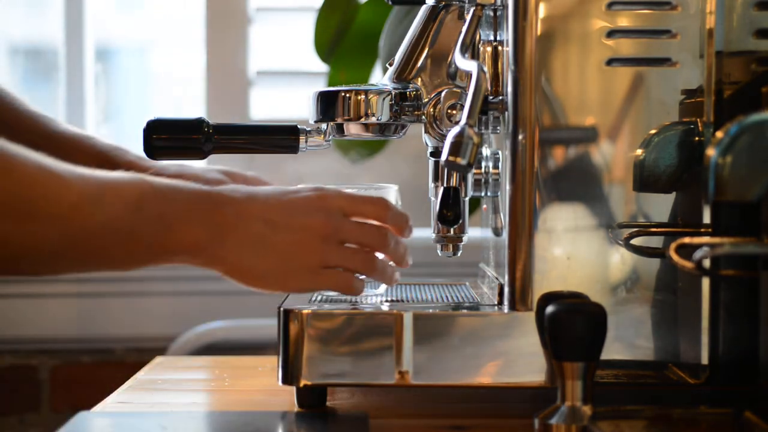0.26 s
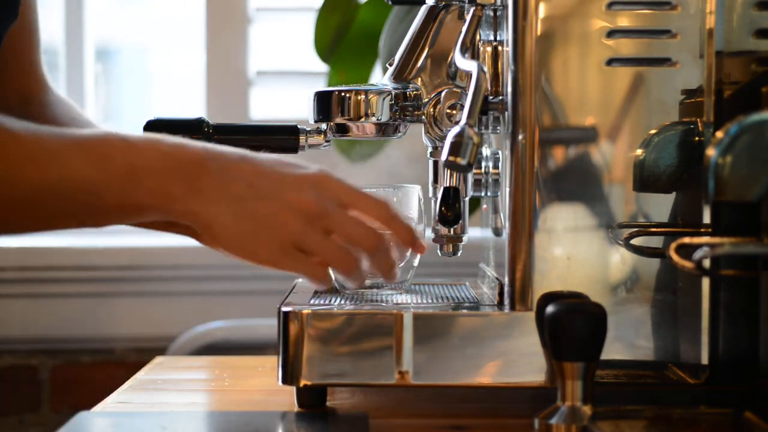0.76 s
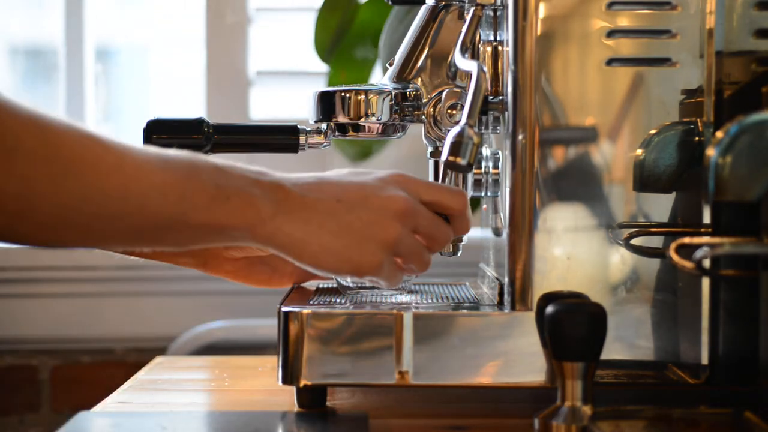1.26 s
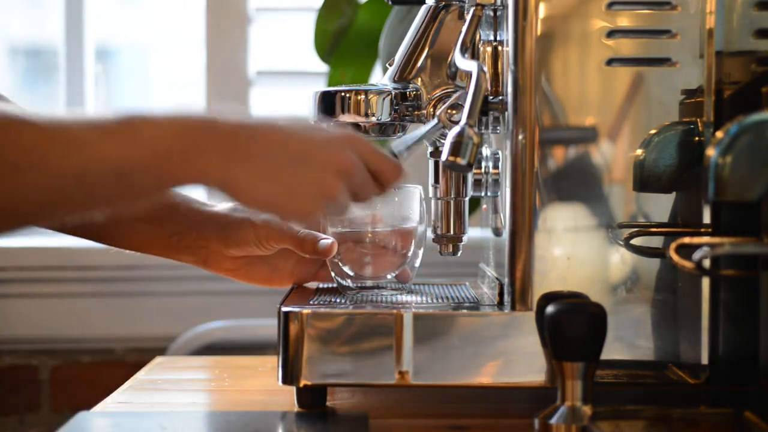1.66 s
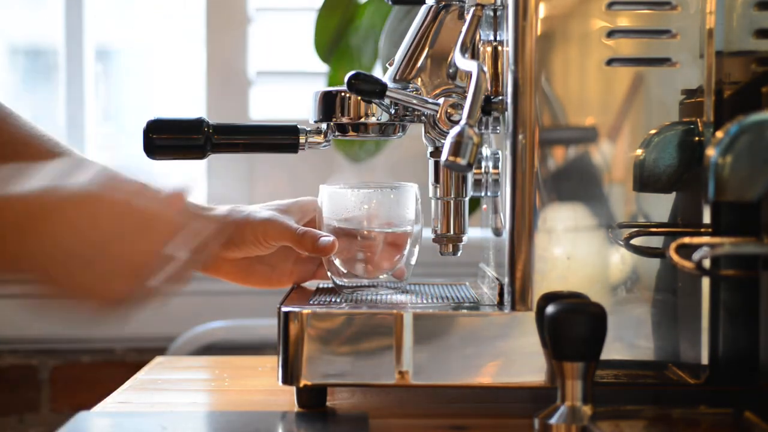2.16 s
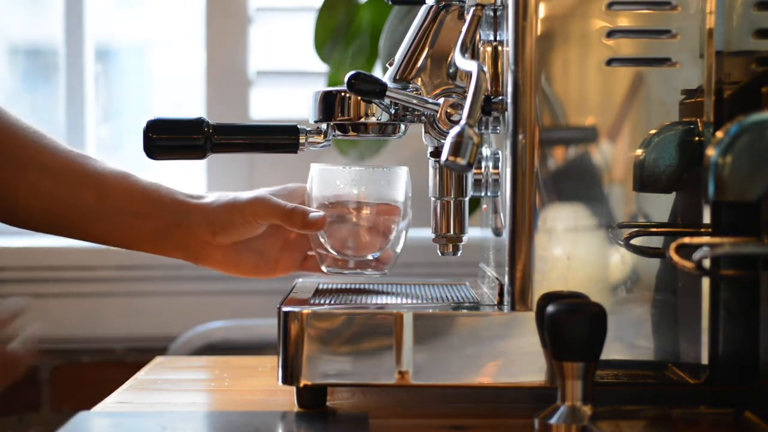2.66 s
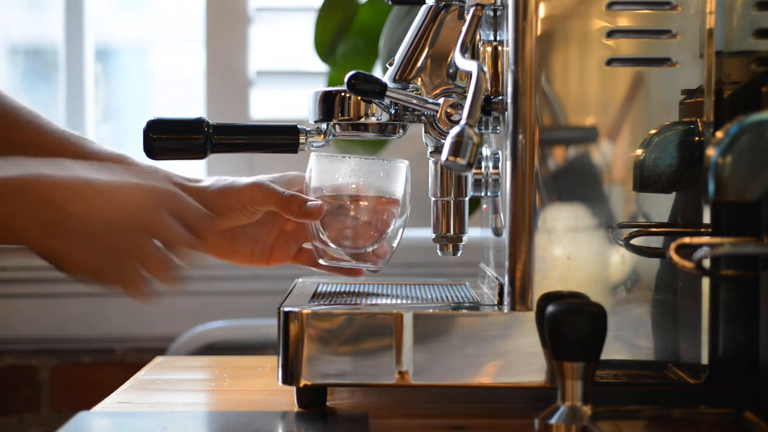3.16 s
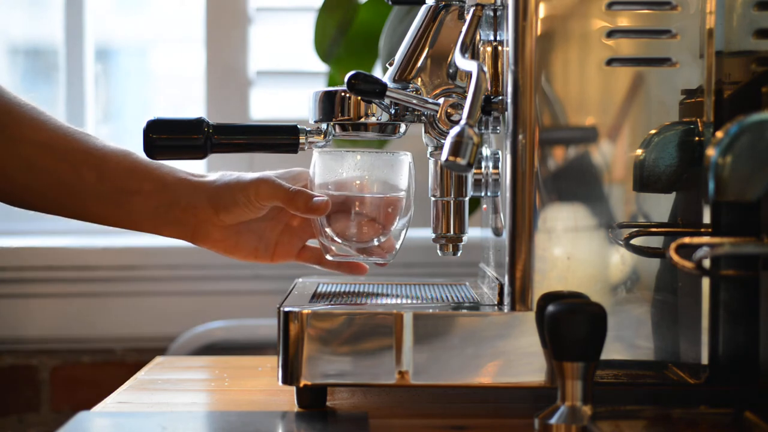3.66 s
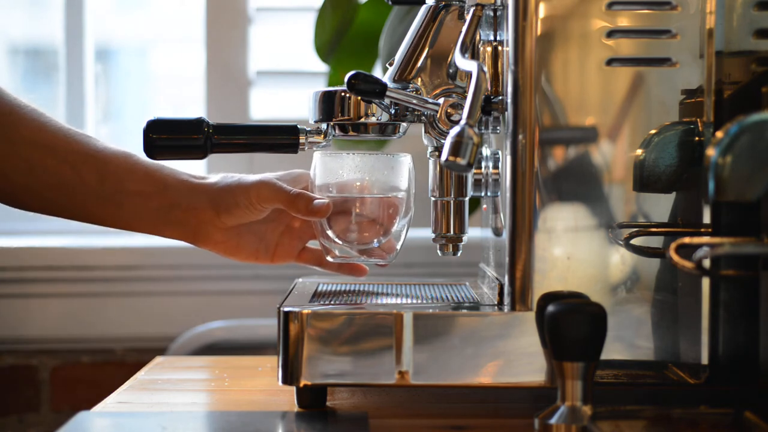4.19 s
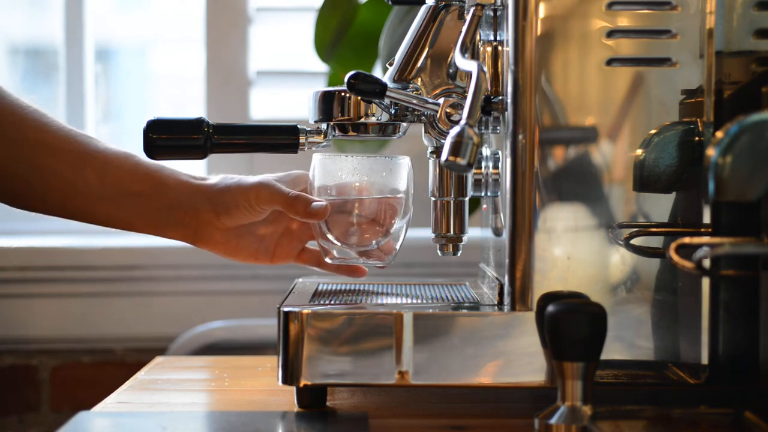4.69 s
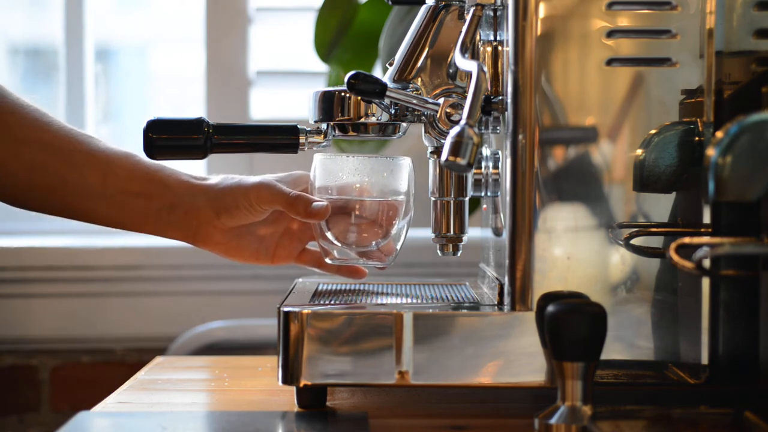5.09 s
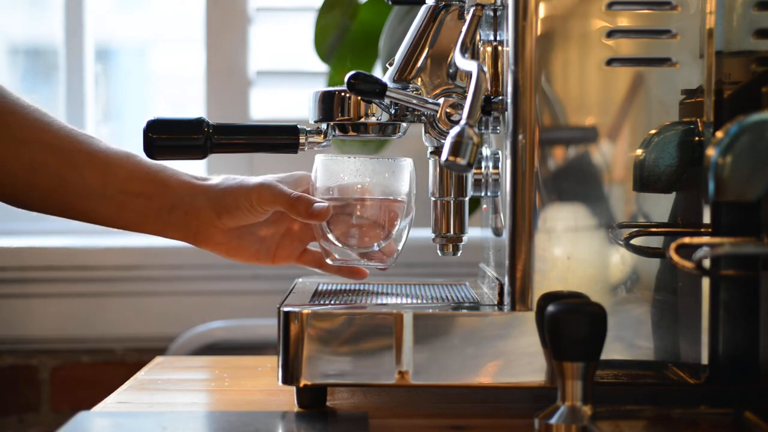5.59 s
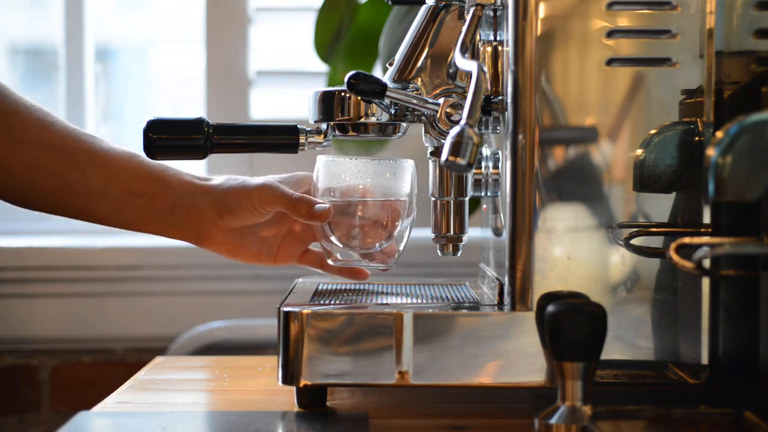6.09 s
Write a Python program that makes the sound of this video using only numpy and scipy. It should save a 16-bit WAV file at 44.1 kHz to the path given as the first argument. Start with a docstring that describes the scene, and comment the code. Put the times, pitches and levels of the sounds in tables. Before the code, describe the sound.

A glass clatters onto a metal drip tray and scrapes into place, a lever clacks hard, and an espresso machine pump buzzes steadily until the end.

```python
"""A small kitchen with hard walls and a quiet room tone, espresso machine in front; the pump is heard dry, as if close.
A glass lands on the steel drip tray, rocks and is slid into place: struck modes, coloured hiss and squeaks.
The brew lever clacks up, switches snap and the vibration pump starts, one piston stroke per mains cycle:
harmonics hum in the casing and buzz in its panels, taps rattle the fittings and water churns as coloured noise.
The lifted glass clinks against the filter holder."""
import sys
import numpy as np
from scipy import signal
from scipy.fft import rfft, irfft
from scipy.io import wavfile
from scipy.ndimage import uniform_filter1d

SR = 44100
rng = np.random.default_rng(int(sys.argv[2]) if len(sys.argv) > 2 else 0)


def waveform_to_disk(signal):
    """Save audio, clipped to [-1, 1], as 16-bit WAV at the path in sys.argv[1]."""
    frames = np.transpose(np.atleast_2d(signal))
    scaled = np.clip(frames, -1, 1) * 32767
    samples = np.round(scaled).astype(np.int16)
    wavfile.write(sys.argv[1], SR, samples)


N = 279594
TIME = np.arange(N) / SR
TAIL = TIME[:SR * 3 // 4]   # time axis of every ring: 0.75 s


def from_db(db):
    """Decibels to amplitude."""
    return 10 ** (np.asarray(db) / 20)


def rms_one(x):
    """Scaled to rms 1 over its whole length."""
    return x / np.sqrt(np.mean(x ** 2) + 1e-20)


def steady(x):
    """Scaled to a running rms of 1 over half a second."""
    return x / np.sqrt(uniform_filter1d(x ** 2, size=SR // 2))


def ramp(start_s, length_s):
    """Rises evenly from 0 to 1, starting at start_s."""
    return np.clip((TIME - start_s) / length_s, 0, 1)


def dying(t60_s):
    """Falls 60 dB in t60_s."""
    return from_db(-60 * TAIL / t60_s)


def swelling(swell_s):
    """Smooth rise from 0 to 1 of a body that takes up a blow slowly."""
    return 1 - np.exp(-(TAIL / swell_s) ** 2)


def drift(rate_hz):
    """Smooth chance with spread near 1, renewed rate_hz times a second."""
    steps = rng.standard_normal(2048)
    return np.interp(TIME * rate_hz, np.arange(len(steps)), steps)


def noise(spectrum, size):
    """Noise of rms 1 with the given colour, cut away below the first row."""
    hz, db = np.transpose(spectrum)
    bins_hz = np.fft.rfftfreq(size, 1 / SR) + 1   # 1 Hz up, to avoid log of zero
    colour = from_db(np.interp(np.log(bins_hz), np.log(hz), db))
    low_cut = 1 / np.sqrt(1 + (hz[0] / 2 / bins_hz) ** 6)
    return rms_one(irfft(rfft(rng.standard_normal(size)) * colour * low_cut, size))


def resonate(x, hz, width_hz):
    """One resonance driven by x, scaled to rms 1."""
    radius = np.exp(-np.pi * width_hz / SR)
    poles = [1, -2 * radius * np.cos(2 * np.pi * hz / SR), radius * radius]
    return rms_one(signal.lfilter([1, 0, -1], poles, x))


def dense_ring(spectrum, t60_s, damping):
    """Crowded modes as noise dying octave by octave, the high ones sooner; t60_s holds at 1 kHz."""
    size = len(TAIL)
    whole = rfft(noise(spectrum, size))
    octave = np.log2(np.clip(np.fft.rfftfreq(size, 1 / SR), 125, 16000) / 1000)
    out = np.zeros(size)
    for k in range(-3, 5):
        weight = np.maximum(1 - np.abs(octave - k), 0)   # overlapping triangles, one octave apart
        out += irfft(whole * weight, size) * dying(t60_s * 2 ** (-damping * k))
    return out


def clear_ring(modes, longest_t60_s, uneven_db):
    """Single modes as dying sines, each struck with a strength and sign of its own."""
    hz, db, t60_s = np.transpose(modes)
    total = np.sqrt(np.sum(from_db(db) ** 2) / 2)
    gains = from_db(db + uneven_db * rng.standard_normal(len(hz))) / total
    gains = gains * rng.choice([-1, 1], len(hz))
    out = np.zeros(len(TAIL))
    for gain, f, t60 in zip(gains, hz, t60_s):
        out += gain * np.sin(2 * np.pi * f * TAIL) * dying(min(t60, longest_t60_s))
    return out


def tilted(table, bright_db):
    """Levels tilted by bright_db an octave about 3 kHz."""
    rows = np.array(table, float)
    rows[:, 1] += bright_db * np.log2(np.clip(rows[:, 0], 200, 12000) / 3000)
    return rows


def add(track, start_s, sound):
    """Lay a sound into the track at start_s."""
    start = round(start_s * SR)
    track[start:start + len(sound)] += sound[:N - start]


def blows(hits, spectrum, modes, t60_s, damping, modes_db, longest_t60_s):
    """Each contact rings crowded and clear modes of the body, with a brightness of its own."""
    out = np.zeros(N)
    for start_s, level_db, bright_db in hits:
        crowd = dense_ring(tilted(spectrum, bright_db), t60_s, damping)
        notes = clear_ring(tilted(modes, bright_db), longest_t60_s, uneven_db=2.5)
        add(out, start_s, from_db(level_db) * (crowd + from_db(modes_db) * notes))
    return out


def kitchen(x, wet_db, first_echo_s=0.0034):
    """The place: a short diffuse tail off hard walls, added to the direct sound."""
    tail = dense_ring([(100, -3), (300, 0), (6000, -1), (15000, -10)], t60_s=0.52, damping=0.1)
    tail = tail * (TAIL > first_echo_s)
    return x + from_db(wet_db) * signal.fftconvolve(x, tail / np.linalg.norm(tail))[:N]


# colour of the quiet kitchen: pitch_hz, level_db (per Hz)
ROOM_COLOUR = [(15, -42), (25, -6.5), (122, 5), (340, 0.5), (433, -0.5), (509, -5), (895, -6.5), (997, -9),
               (1270, -9), (1410, -8.5), (2700, -15), (8580, -24.5), (15500, -29.5)]


def room_tone(level_db=-47.5):
    """Steady coloured noise behind everything."""
    return from_db(level_db) * noise(ROOM_COLOUR, size=N)


# the glass rocks on its base, weaker each time, and its rim touches twice in every rock
ROCK_START_S, ROCK_PERIOD_S, ROCK_DB, ROCK_LOSS_DB, ROCK_BRIGHT_DB = 0.293, 0.096, -33, 4, -0.5
RETOUCH_S, RETOUCH_LOSS_DB = 0.015, 0


def rocking(count=3):
    """Contacts of the rocking glass: evenly spaced pairs that die away."""
    contacts = []
    for k in range(count):
        for again in (0, 1):
            start_s = ROCK_START_S + k * ROCK_PERIOD_S + again * RETOUCH_S
            level_db = ROCK_DB - k * ROCK_LOSS_DB - again * RETOUCH_LOSS_DB
            contacts.append((start_s, level_db, ROCK_BRIGHT_DB))
    return contacts


# fingers nudge the glass into place with faint ticks at uneven moments
NUDGE_FROM_S, NUDGE_TO_S, NUDGE_DB, NUDGE_BRIGHT_DB = 0.95, 1.12, -52.5, -1.5


def nudges(count=8, uneven_db=3.0):
    """Faint contacts, one at a chance moment in each equal share of the nudging time."""
    step_s = (NUDGE_TO_S - NUDGE_FROM_S) / count
    contacts = []
    for k, (late, strength) in enumerate(rng.random((count, 2))):
        level_db = NUDGE_DB + uneven_db * (2 * strength - 1)
        contacts.append((NUDGE_FROM_S + step_s * (k + late), level_db, NUDGE_BRIGHT_DB))
    return contacts


# glass landing on the tray: start_s, level_db, brightness_db_per_octave
LANDING_HITS = [(0.169, -16, 2), (0.1746, -17, 2.5), (0.185, -27.5, -7), (0.196, -31, 5),
                (0.215, -22, -2.5), (0.227, -25.5, 2.5)]
# clear notes of the steel grid: pitch_hz, level_db, t60_s (before the cap)
GRID_MODES = [(1423, 3, 0.42), (1880, -5, 0.63), (2270, 5, 0.12), (3200, -18, 0.34), (3640, -13, 0.27),
              (3970, -3, 0.19), (4300, -12, 0.32), (5030, 3, 0.47), (6100, -1, 0.26), (8260, -14, 0.28)]
# crowded modes of the grid: pitch_hz, level_db (per Hz)
GRID_CLATTER = [(50, -40), (240, -5.5), (380, -7), (500, -9), (1000, -8.5), (1400, -10), (1600, -10.5),
                (2200, -12), (2800, -16), (4000, -11.5), (5100, -11), (7000, -19.5), (10000, -29.5),
                (15500, -43)]


def tray_clatter():
    """Landing, rocking and nudging contacts all ring the steel grid."""
    hits = LANDING_HITS + rocking() + nudges()
    return blows(hits, GRID_CLATTER, GRID_MODES, t60_s=0.22, damping=0.12,
                 modes_db=-17.5, longest_t60_s=0.43)


# low notes of the hollow pan under the grid: pitch_hz, level_db, t60_s, swell_s
PAN_NOTES = [(256, -14.5, 0.19, 0.016), (686, -1.5, 0.15, 0.035)]


def pan_boom():
    """The steel pan takes up the blow slowly and rings with a few low notes."""
    out = np.zeros(N)
    start_s = LANDING_HITS[1][0]
    for hz, db, t60_s, swell_s in PAN_NOTES:
        note = np.sin(2 * np.pi * hz * TAIL) * dying(t60_s) * swelling(swell_s)
        add(out, start_s, from_db(db) * note)
    return out


# squeaks as the glass slips: start_s (the middle), pitch_hz, level_db (at the peak), length_s
GLASS_SQUEAKS = [(1.026, 3650, -50, 0.015), (1.068, 3400, -58, .008), (1.53, 4830, -53.5, .06)]


def glass_squeaks(width_hz=220):
    """Each slip is a narrow band of noise that swells and fades."""
    out = np.zeros(N)
    for middle_s, hz, db, length_s in GLASS_SQUEAKS:
        envelope = np.exp(-((TIME - middle_s) / length_s) ** 2)
        out += from_db(db) * envelope * resonate(rng.standard_normal(N), hz, width_hz)
    return out


# pushes that slide the glass over the grid: start_s, length_s, level_db (before slide_db and grip)
GLASS_PUSHES = [(0.622, 0.098, -52), (0.872, 0.37, -52.5), (1.225, 0.13, -50), (1.36, 0.29, -53)]
# colour of glass sliding on steel: pitch_hz, level_db (per Hz)
SLIDE_HISS = [(500, -11), (1200, -6), (2700, -8.5), (3700, -5), (4400, -2), (4950, 0.5), (5400, -3.5),
              (6600, -6), (8000, -17), (12000, -35)]


def glass_slide(slide_db=-1.5, grip_db=1.5, ease_s=0.02):
    """Friction hiss during each push, flickering as the grip varies."""
    sliding = np.zeros(N)
    for start_s, length_s, db in GLASS_PUSHES:
        sliding += from_db(db) * (ramp(start_s, ease_s) - ramp(start_s + length_s, ease_s))
    grip = from_db(slide_db + grip_db * drift(71.1))
    return sliding * grip * noise(SLIDE_HISS, size=N)


# lever striking its stop and rebounding: start_s, level_db, brightness_db_per_octave
LEVER_STRIKES = [(1.5955, -14.5, 3.5), (1.598, -10, 2.5), (1.602, -14.5, -1.5), (1.607, -21.5, -3.5),
                 (1.618, -33, -10)]
# clear notes of the lever: pitch_hz, level_db, t60_s (before the cap)
LEVER_NOTES = [(286, -0.5, 0.19), (615, 0, 0.39), (1386, 6.5, 0.16), (1879, -2.5, 0.27), (2500, -18, 0.091),
               (2940, -15, 0.19), (3666, -33, 1.0), (4760, -20, 5.0), (5140, -26, 0.86), (6190, -12, 0.031),
               (6300, -22, 0.28), (7250, -8, 0.43)]
# crowded modes of the clack: pitch_hz, level_db (per Hz)
LEVER_CROWD = [(59, -54), (100, -32), (275, 0), (429, -24), (614, -2.5), (998, -24), (1210, -5), (1430, 2),
               (2130, -15), (2630, 4), (3180, -15), (6000, -12), (6530, -20.5), (9950, -22), (15500, -41)]


def brew_lever():
    """The lever clacks against its stop, each rebound ringing it again."""
    return blows(LEVER_STRIKES, LEVER_CROWD, LEVER_NOTES, t60_s=0.11, damping=0.12,
                 modes_db=-13, longest_t60_s=0.16)


# valve and pump switch snapping: start_s, level_db, brightness_db_per_octave
SNAPS = [(1.644, -25, -8), (1.6485, -24, -5.5), (1.7175, -35, 8), (1.721, -25, -7.5), (1.738, -26.5, -8),
         (1.794, -31, -10)]
# clear notes of the snap: pitch_hz, level_db, t60_s (before the cap)
SNAP_NOTES = [(5330, -6, 0.074), (6000, 0, 0.077), (6100, 1, 0.079), (6950, 1, 0.097), (7600, -9, 0.098),
              (8700, -12, .12)]
# crowded modes of the snap: pitch_hz, level_db (per Hz)
SNAP_CROWD = [(100, -40), (1000, -21.5), (3500, -10), (6000, 2.5), (7500, -1), (10000, -11), (15500, -27)]


def switches():
    """Valve and pump switch snap, with high, very short notes."""
    return blows(SNAPS, SNAP_CROWD, SNAP_NOTES, t60_s=0.18, damping=0.18,
                 modes_db=-3.5, longest_t60_s=0.039)


# glass against the filter holder: start_s, level_db, brightness_db_per_octave
CLINK_CONTACTS = [(2.8555, -21.5, -1.5), (2.859, -23.5, 1), (2.881, -24.5, -4)]
# clear notes of the glass: pitch_hz, level_db, t60_s (before the cap)
GLASS_NOTES = [(1824, 3, 0.11), (3720, -8, 0.15), (5350, -2, 0.1), (6180, -7, 0.071), (7240, -17, .06),
               (7900, -16, 0.11)]
# crowded modes of the tick: pitch_hz, level_db (per Hz)
TICK_CROWD = [(100, -38), (500, 5), (1000, 9), (2500, -3), (4000, 11), (7000, -26), (10000, -17),
              (15500, -29)]


def glass_clink():
    """The lifted glass touches the filter holder: ticks with short glassy notes."""
    return blows(CLINK_CONTACTS, TICK_CROWD, GLASS_NOTES, t60_s=0.056, damping=0.12,
                 modes_db=1.5, longest_t60_s=0.13)


PUMP_START_S, MAINS_HZ = 1.745, 60   # one piston stroke per mains cycle
# when each part answers within a stroke: piston knocks, panels start to ring, casing swings back
KNOCK_MS, PANEL_MS, CASING_MS = 5.35, 0.32, 11.88
FIRST_KNOCK_ORDER, FIRST_PANEL_ORDER = 8, 13
SMEAR_MS_PER_ORDER = 3.8   # sheet metal carries each pitch at its own speed
# around this harmonic the casing lets its lower notes come later
CASING_ORDER, CASING_SMEAR_MS_PER_ORDER = 5, 2.6
SCATTER_TURNS = 0.076   # unevenness of the delay at the lowest panel harmonic; it grows with pitch


def stroke_delay(order):
    """Delay of one harmonic after the start of the stroke, in turns of that harmonic."""
    if order < FIRST_KNOCK_ORDER:
        ms = CASING_MS - CASING_SMEAR_MS_PER_ORDER * (order - CASING_ORDER) ** 2 / (2 * order)
    elif order < FIRST_PANEL_ORDER:
        ms = KNOCK_MS
    else:
        ms = PANEL_MS + SMEAR_MS_PER_ORDER * (order - FIRST_PANEL_ORDER) ** 2 / (2 * order)
    turns = order * MAINS_HZ * ms / 1000
    return turns + SCATTER_TURNS * (order / FIRST_PANEL_ORDER) ** 2 * rng.standard_normal()


# the casing hums hard while the pump runs free, settles, then grows slowly with the pressure
HUM_DB, FREE_RUN_DB, SETTLE_S, PRESSURE_DB_PER_S = -31, 5, 1.0, 0.7
CASING_RISE_S = 0.028   # the heavy casing takes a moment to get going
# the panels buzz with a kick at the start and a little less under load
BUZZ_DB, KICK_DB, KICK_S, LOAD_LOSS_DB = -24, 2.5, 0.12, 1.12
LOAD_FROM_S, LOAD_TO_S = 3.27, 3.52   # the group fills and the coffee begins to resist
# while the group is filling, the harmonics on either side of the main panel note are weaker
MAIN_ORDER, FILLING_BELOW_DB, FILLING_ABOVE_DB = 15, -2.7, -4
WHINE_ORDER, WHINE_DB = 70, -52.5   # one fitting sings along with this harmonic of the stroke
# stroke harmonics once the coffee resists: order (multiple of the stroke rate), level_db (relative)
STROKE_HARMONICS = [(1, -17), (2, -17), (3, -18), (4, -2), (5, -11), (6, -4), (7, -22), (8, -14), (9, -13),
                    (10, -13), (11, -13), (12, -21), (13, -10), (14, -6), (15, 0), (16, -4), (17, -7),
                    (18, -14), (19, -20), (20, -15), (21, -20), (22, -14), (23, -27), (24, -21), (25, -19),
                    (26, -19), (27, -14), (28, -15), (29, -18), (30, -16), (31, -10), (32, -22), (33, -19),
                    (34, -24), (35, -22), (36, -25), (37, -28), (38, -26)]


def pump_hum(age_s, waver_db=1.16, wander_ms=0.061):
    """Stroke harmonics: the lowest shake the casing, the rest buzz in its panels and fill out under load."""
    load = ramp(LOAD_FROM_S, LOAD_TO_S - LOAD_FROM_S)
    hum_db = HUM_DB + FREE_RUN_DB * np.exp(-age_s / SETTLE_S) + PRESSURE_DB_PER_S * age_s
    buzz_db = BUZZ_DB + KICK_DB * np.exp(-age_s / KICK_S) - LOAD_LOSS_DB * load
    lag_s = wander_ms * drift(25) / 1000   # strokes come a fraction of a millisecond early or late
    hum, buzz = np.zeros(N), np.zeros(N)
    for order, db in STROKE_HARMONICS:
        filling_db = FILLING_BELOW_DB * (order < MAIN_ORDER) + FILLING_ABOVE_DB * (order > MAIN_ORDER)
        level = from_db(db + (1 - load) * filling_db + waver_db * drift(6.5))
        turns = order * MAINS_HZ * (TIME + lag_s) - stroke_delay(order)
        tone = level * np.sin(2 * np.pi * turns)
        if order < FIRST_KNOCK_ORDER:
            hum += tone
        else:
            buzz += tone
    casing = from_db(hum_db) * (1 - np.exp(-age_s / CASING_RISE_S)) * steady(hum)
    panels = from_db(buzz_db) * steady(buzz)
    whine = from_db(WHINE_DB + waver_db * drift(7)) * np.sin(2 * np.pi * WHINE_ORDER * MAINS_HZ * TIME)
    return casing + panels + whine


# crowded modes of the tapped fittings: pitch_hz, level_db (per Hz)
FITTINGS_COLOUR = [(1500, -53), (2300, -8), (2700, -2.5), (3100, -1.5), (3700, -1.5), (4400, -0.5),
                   (5500, 2), (5950, -16), (6400, -11), (7300, -8), (9500, -21), (15500, -24.5)]
# thin panels and fittings: pitch_hz, width_hz, level_db
PANEL_RESONANCES = [(2535, 9, -2.5), (2913, 5.3, -5), (3370, 16, -3.5), (4160, 45, 2), (4665, 13, 1),
                    (4946, 46, -2.5), (5730, 20, -0.5), (6160, 33, -3)]


def pump_rattle(jitter_ms=0.02, uneven_db=1.0, panels_db=-8, flow_share=0.89):
    """Every stroke taps the fittings, never quite alike; taps and rushing water ring the thin panels."""
    strokes_s = np.arange(0, TIME[-1] - 1 / MAINS_HZ, 1 / MAINS_HZ)
    late, strength = rng.standard_normal((len(strokes_s), 2)).T
    taps_s = np.abs(strokes_s + jitter_ms * late / 1000)
    taps = np.zeros(N)
    taps[np.round(taps_s * SR).astype(int)] = from_db(uneven_db * strength)
    ring = dense_ring(FITTINGS_COLOUR, t60_s=0.18, damping=0.049)
    fittings = rms_one(signal.fftconvolve(taps, ring)[:N])
    drive = rms_one(taps) + flow_share * rng.standard_normal(N)
    panels = sum(from_db(db) * resonate(drive, hz, width) for hz, width, db in PANEL_RESONANCES)
    return fittings + from_db(panels_db) * panels


# water in the pump: pitch_hz, level_db (per Hz)
WATER_COLOUR = [(30, -24), (100, -46), (250, -3.5), (720, -7.5), (900, -8), (1100, -7), (1400, -14),
                (1800, -7.5), (2200, -17), (4500, -17), (5700, -11.5), (7000, -21), (9500, -38.5),
                (15500, -53)]


def pump_water(surge=0.07):
    """Churning water: coloured noise that surges with each stroke."""
    return noise(WATER_COLOUR, size=N) * (1 + surge * np.sin(2 * np.pi * MAINS_HZ * TIME))


# the pump jolts once on its mounts as it takes up pressure
JOLT_S, JOLT_HZ, JOLT_DB, JOLT_T60_S, JOLT_SWELL_S = 1.795, 205, -18.5, 0.14, 0.0054


def pump(rattle_db=-41, churn_db=-35, inside_waver_db=0.26, rise_s=0.0071):
    """The main source: hum, rattle and water come up together, with one low jolt on the mounts."""
    age_s = np.maximum(TIME - PUMP_START_S, 0)
    running = 1 - np.exp(-age_s / rise_s)
    inside = from_db(rattle_db) * pump_rattle() + from_db(churn_db) * pump_water()
    inside = inside * from_db(inside_waver_db * drift(11))
    out = running * (pump_hum(age_s) + inside)
    jolt = np.sin(2 * np.pi * JOLT_HZ * TAIL) * dying(JOLT_T60_S) * swelling(JOLT_SWELL_S)
    add(out, JOLT_S, from_db(JOLT_DB) * jolt)
    return out


def scene():
    """Glass, lever and switches with the walls around them, the pump dry, over the quiet of the kitchen."""
    glass_on_grid = tray_clatter() + glass_squeaks() + glass_slide()
    tray = kitchen(glass_on_grid, wet_db=-9.0) + kitchen(pan_boom(), wet_db=-23.0)
    machine = kitchen(brew_lever() + switches() + glass_clink(), wet_db=-11.5)
    return (room_tone() + tray + machine + pump())[None]


def record(dry, cutoff_hz=15750):
    """At the microphone the tallest peaks are rounded off and the top is cut steeply."""
    rounded = dry / (1 + (dry / 0.7) ** 6) ** (1 / 6)
    return signal.sosfilt(signal.ellip(12, 0.1, 90, cutoff_hz, fs=SR, output="sos"), rounded)


dry = scene()
out = record(dry)
waveform_to_disk(out)
```